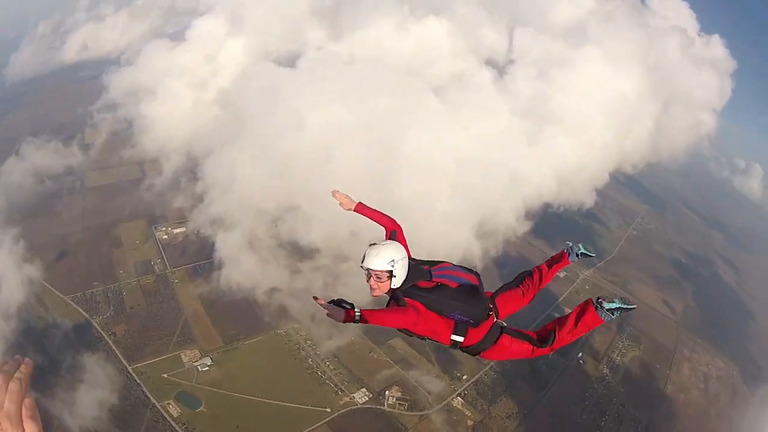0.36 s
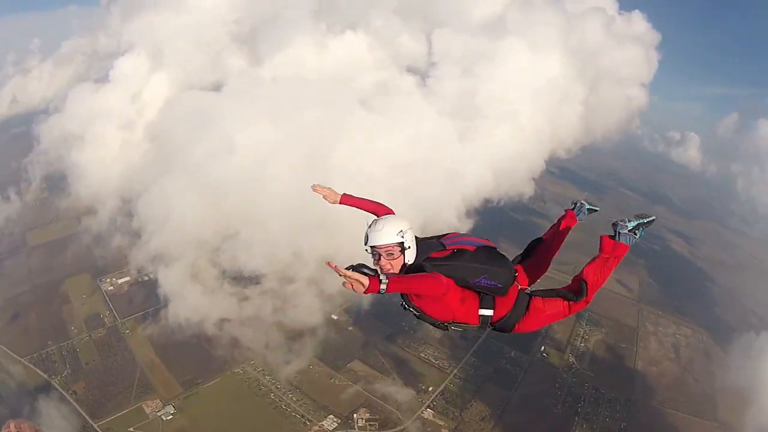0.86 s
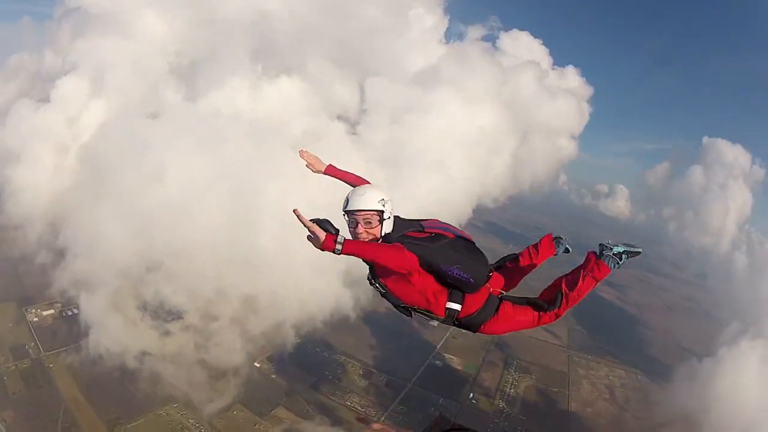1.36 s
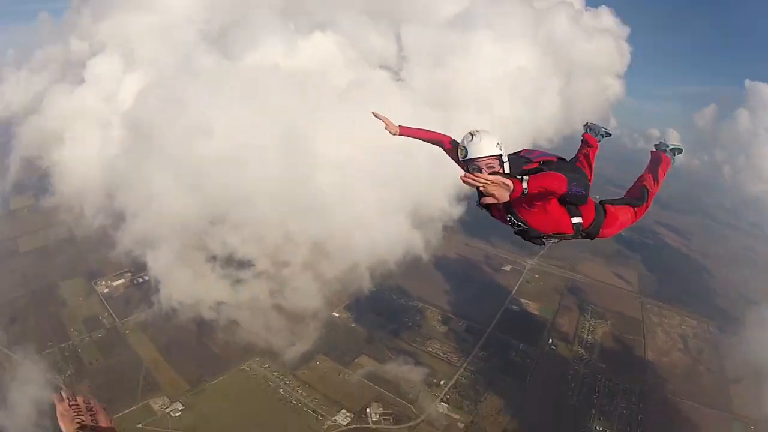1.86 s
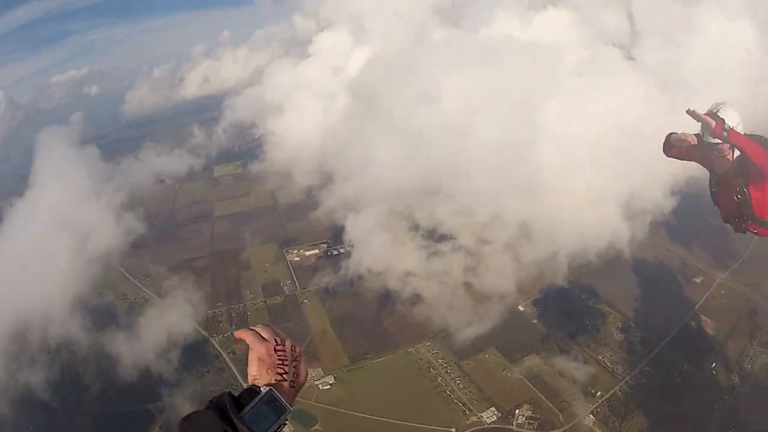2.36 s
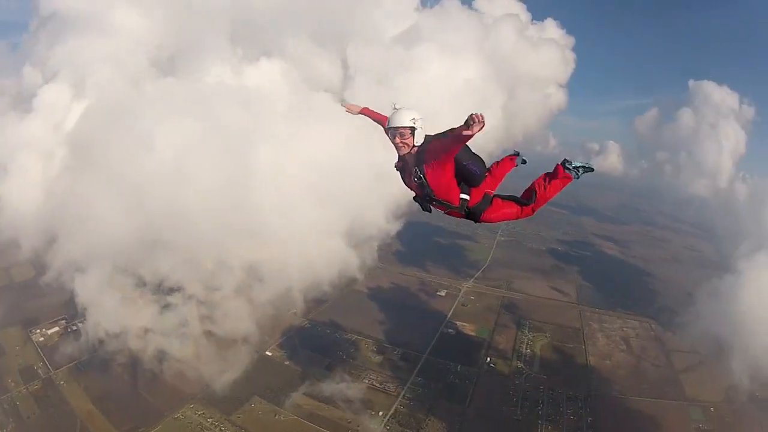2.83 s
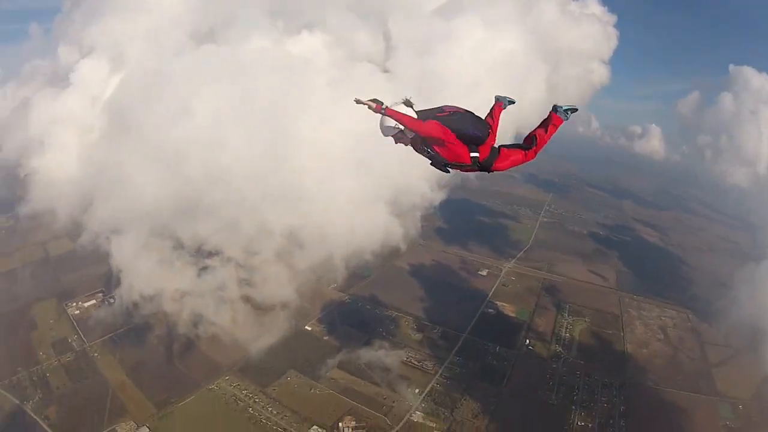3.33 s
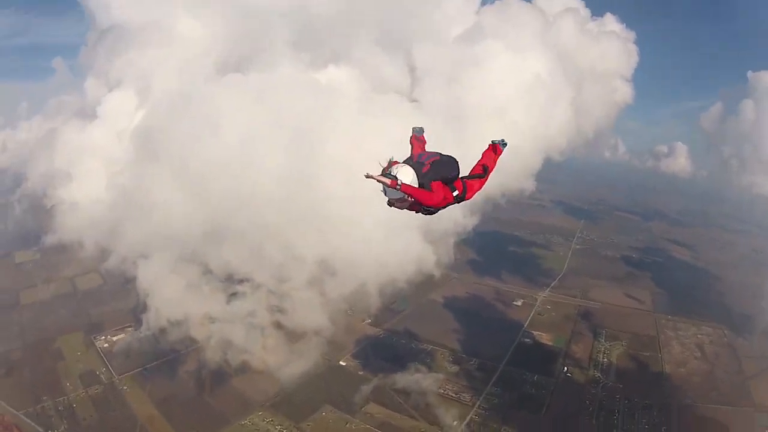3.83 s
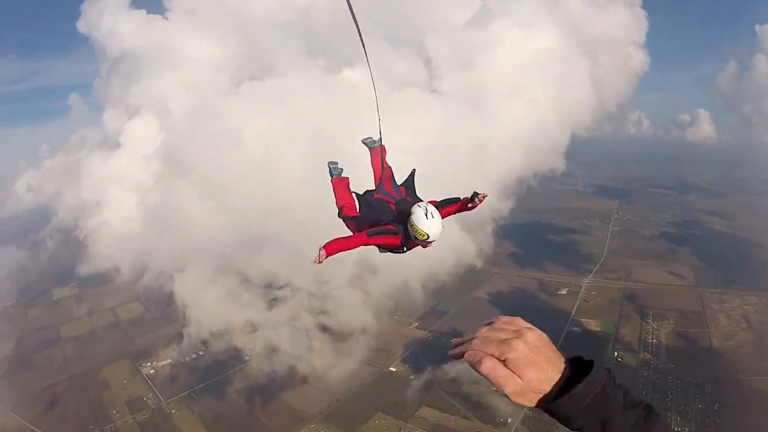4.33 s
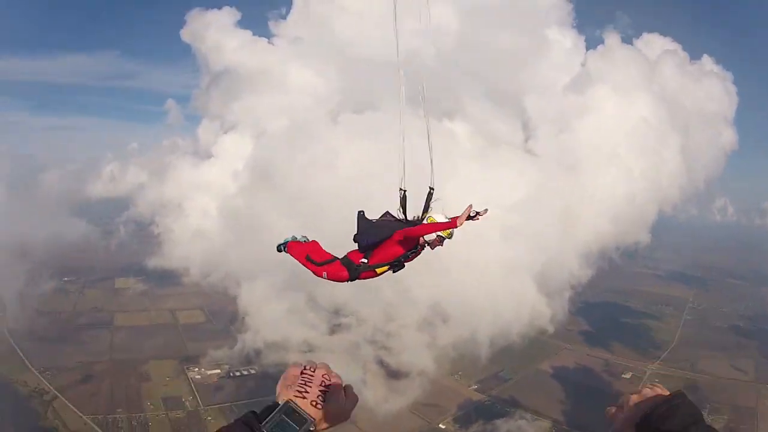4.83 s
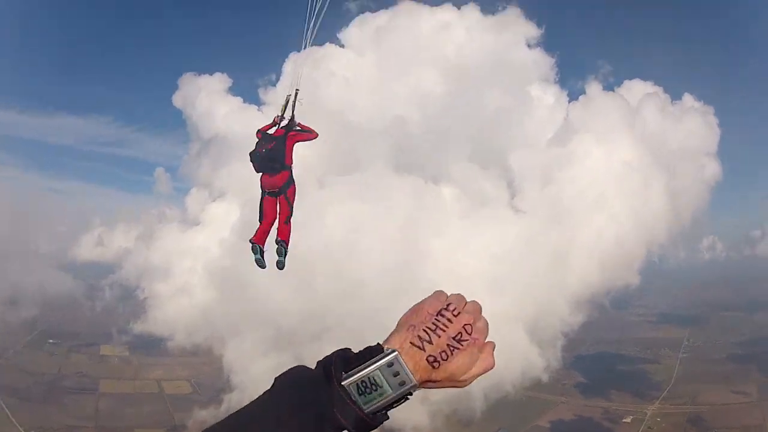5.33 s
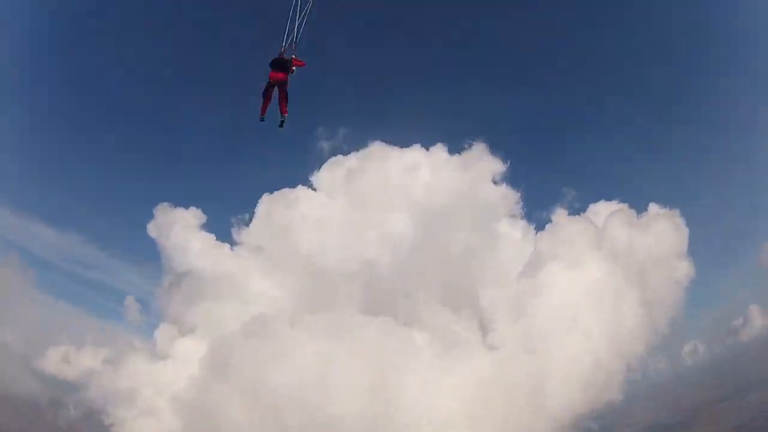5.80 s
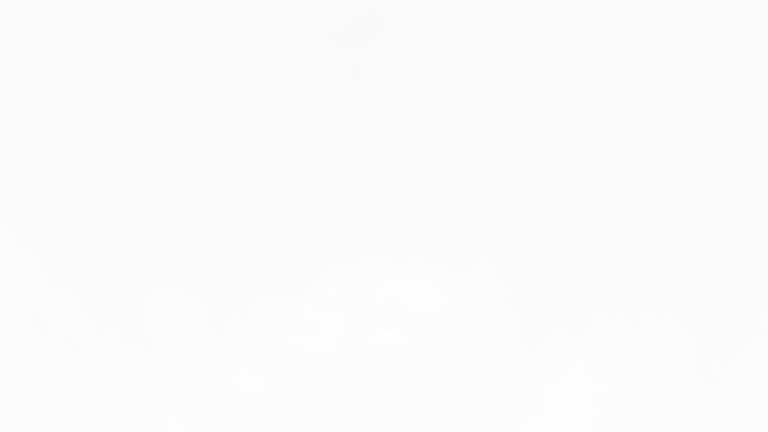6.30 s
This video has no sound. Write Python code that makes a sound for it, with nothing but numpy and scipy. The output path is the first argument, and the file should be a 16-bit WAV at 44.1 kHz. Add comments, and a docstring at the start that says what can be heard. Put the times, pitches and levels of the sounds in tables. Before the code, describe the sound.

Air at skydiving speed tears over a microphone shut in a hard camera case. A lumpy throb near 100 Hz thuds continuously, with quicker slaps above it and rough, flickering, boxy hiss breaking into tiny spits. Gusts and momentary dips come irregularly as the head turns. The sound is clipped, gritty and squashed, with no room echo, and fades quickly at about six seconds.

```python
"""Wind over a cased helmet camera

Air at falling speed tears over a helmet camera shut in a hard case, right at the microphone.
Big eddies buffet the diaphragm near 100 Hz, as lumpy noise with quicker slaps above it.
Small eddies hiss as flickering noise and spit in brief puffs, both through the modes of the case.
The camera ducks and clips, and its samples are held in steps; the sound fades out at the end."""
import sys
import numpy as np
from scipy import signal
from scipy.fft import rfft, irfft
from scipy.io import wavfile
from scipy.ndimage import uniform_filter1d

SR = 44100
rng = np.random.default_rng(int(sys.argv[2]) if len(sys.argv) > 2 else 0)


def attenuation_scalar(level_db):
    """Turn a level in dB into a linear amplitude multiplier (20 dB per decade)."""
    decades = np.asarray(level_db, float) / 20
    return 10 ** decades


def digitize_waveform(pressure):
    """Quantize a signal to 16-bit integers and store it at the path in sys.argv[1].

    Rows of a 2-D input are taken as channels; values are limited to [-1, 1].
    """
    field = np.atleast_2d(pressure).T
    bounded = np.clip(field, -1, 1)
    quanta = np.round(bounded * 32767).astype(np.int16)
    wavfile.write(sys.argv[1], SR, quanta)


N = 294588

# Colour of the small eddies. Each row: frequency in Hz, relative density in dB per Hz.
HISS_SPECTRUM = [(250, -6), (500, -15.5), (800, -11), (1500, -8.5), (2500, -9), (3300, -18.5),
                 (4500, -22.5), (5600, -21.5), (6000, -29.5)]
# The stream as the head turns. Each row: time in seconds, large eddies in dB, small eddies in dB,
# how far the microphone port faces the air (0 to 1).
STREAM = [(0, -29, -38.5, 0.84), (.2, -34.5, -41.5, 0.78), (.45, -32, -44, 0.63), (.6, -27, -44.5, .5),
          (1.1, -28, -42.5, 0.38), (1.5, -28.5, -43.5, 0.2), (2.0, -27.5, -44, 0.57),
          (2.5, -27, -42.5, 0.56), (3.0, -30, -36.5, 0.11), (3.6, -29, -42, 0.5), (4.1, -31, -39.5, .2),
          (4.7, -29.5, -40, 0.34), (5.3, -32, -37, 0), (5.75, -32, -41.5, 0.18), (6.05, -36, -36, 0),
          (6.38, -27.5, -40, 0.46)]
LARGE, SMALL, FACING = 1, 2, 3  # columns of the stream
USUAL_LARGE_DB = -30  # large eddies at which slaps and roar have their plain level


def evened(x):
    """Scales to rms 1."""
    return x / np.sqrt(np.mean(x ** 2) + 1e-20)


def read(points, hz):
    """Reads a spectrum on a log-frequency axis."""
    f, value = np.transpose(points)
    return np.interp(np.log(hz + 1), np.log(f + 1), value)


def control(table, column, t):
    """One column of a control table at times t."""
    rows = np.array(table)
    return np.interp(t, rows[:, 0], rows[:, column])


def wander(low_hz, high_hz):
    """Random wobble of rms 1 with about equal power in each octave of a range of rates."""
    hz = np.fft.rfftfreq(N, 1 / SR)
    shape = 1 / np.sqrt(hz + low_hz) * (hz / (hz + low_hz)) / (1 + (hz / high_hz) ** 2)
    return evened(irfft(rfft(rng.standard_normal(N)) * shape, N))


def noise(field_db, size, patchy_db=0):
    """Noise of rms 1 whose short-time spectrum follows field_db(hz, t), broken into drifting patches."""
    hop = size // 4
    frames = 4 * N // size + 5
    hz = np.fft.rfftfreq(size, 1 / SR)[:, None]
    a, b, patches = rng.standard_normal((frames, len(hz), 3)).T
    patches = uniform_filter1d(patches, size=8, axis=0)
    patches = evened(uniform_filter1d(patches, size=8, axis=1))
    level_db = field_db(hz, np.arange(frames) * size / 4 / SR) + patchy_db * patches
    z = (a + 1j * b) * attenuation_scalar(level_db)
    return evened(signal.istft(z, nperseg=size, noverlap=size - hop)[1][:N])


def partly_levelled(x, power):
    """Divides x by a power of its own slow swing, so that its lumps even out in part."""
    smooth_power = uniform_filter1d(uniform_filter1d(x ** 2, size=1300), size=1300)
    swing = np.sqrt(abs(smooth_power) + 0.045)
    return evened(x / swing ** power)


def bump(t, middle, length, db):
    """A smooth bell in dB, length wide at half height and never under 10 ms."""
    return db * np.exp(-4 * np.log(2) * ((t - middle) / max(length, .01)) ** 2)


def eddies(column, t):
    """Strength in dB of the large or small eddies: the stream plus every gust and lull as a smooth bump."""
    # Each row of both: middle in seconds, length in seconds,
    # change of the large eddies in dB, change of the small eddies in dB.
    gusts = [(.1, 0.11, -4, 5.5), (.54, 0.041, 5.5, 5), (.66, 0.059, -1, 8), (.79, 0.053, 2.5, 8.5),
             (1.17, 0.022, 6, 2.5), (1.27, 0.027, 4, 2.5), (1.4, 0.09, 1.5, 4.5), (1.75, 0.03, 5.5, 9.5),
             (2.15, 0.013, -5, 7), (2.24, 0.026, -2.5, 12), (2.51, 0.024, 7.5, 11.5),
             (2.61, .05, -3.5, 3.5), (2.9, 0.24, 1, -1), (3.12, 0.11, -0.5, 3), (3.38, 0.11, 2.5, -1),
             (3.55, 0.028, -3.5, 6), (3.82, 0.074, -2, 5), (3.94, 0.02, 1.5, 4.5), (4.19, 0.033, 4.5, -3.5),
             (4.27, 0.063, 3.5, 2.5), (4.4, 0.031, -7.5, 2.5), (4.62, 0.027, 2.5, 2), (4.83, .06, 10, 6.5),
             (5.07, 0.15, 1.5, 4), (5.49, 0.064, 4.5, -1), (5.63, 0.023, 0, 3.5), (5.79, .1, 4.5, 4.5)]
    lulls = [(0.051, 0.068, -2.5, -7.5), (0.354, 0.088, -5.5, -0.5), (0.602, 0.035, -8, -3),
             (0.873, 0.034, -6.5, -0.5), (0.958, 0.013, -19, -5), (1.092, 0.021, -0.5, -5.5),
             (1.572, 0.095, -4.5, -2.5), (1.806, 0.078, -8.5, -4), (2.077, 0.058, -3.5, 1.5),
             (2.282, 0.012, -4.5, -22), (2.452, 0.15, -5, -2), (3.265, 0.083, -3.5, -2),
             (3.417, 0.018, -11.5, 10.5), (3.578, 0.024, 2, 1.5), (3.914, 0.037, -3, -1.5),
             (4.09, 0.095, -3.5, -2.5), (4.326, 0.087, -2, -4.5), (4.854, 0.063, -9, -4.5),
             (5.115, 0.027, -5.5, -6), (5.304, 0.14, -4, -5.5), (5.407, 0.026, 2.5, -5),
             (5.684, .04, 2.5, -6), (6.058, 0.091, -6.5, -0.5), (6.17, .05, -1, -5.5)]
    bumps = sum(bump(t, row[0], row[1], row[column + 1]) for row in gusts + lulls)
    return control(STREAM, column, t) + bumps


def buffeting():
    """Large eddies push the diaphragm: a lumpy throb, and quicker slaps above it."""
    # Throb and slaps. Each row: frequency in Hz, relative density in dB per Hz.
    throb_spectrum = [(10, -41), (30, -12.5), (50, -4), (80, 2.5), (104, 7.5), (130, -1), (170, -10),
                      (260, -52.5)]
    slap_spectrum = [(90, -42), (160, 2), (220, -1), (320, -11.5), (480, -23.5), (700, -62)]
    t, coarse = np.arange(N) / SR, np.arange(0, N, 128) / SR
    large_db, small_db = eddies(LARGE, coarse), eddies(SMALL, coarse)

    # slaps take a share of the swing of both eddy sizes, and grow as the port faces the air
    slap_db = -43 + 0.54 * (large_db - USUAL_LARGE_DB)
    slap_db += 0.7 * (small_db - control(STREAM, SMALL, coarse))
    slap_db += 7.5 * control(STREAM, FACING, coarse)

    def throb_field_db(hz, s):
        """Facing the air tilts the throb toward the deep."""
        tilt_db = 4 * control(STREAM, FACING, s) ** 2
        return read(throb_spectrum, hz) - tilt_db * np.log2(hz / 90 + .1)

    def slap_field_db(hz, s):
        """Facing the air raises the pitch of the slaps, by up to 48 percent."""
        facing = np.clip(control(STREAM, FACING, s), 0, 1)
        return read(slap_spectrum, hz / (1 + 0.48 * facing ** 2))

    throb = partly_levelled(noise(throb_field_db, size=2048), 0.612)
    slaps = noise(slap_field_db, size=1024)
    slaps = slaps * evened(attenuation_scalar(2.6 * wander(7.5, 51)))
    throb = throb * attenuation_scalar(np.interp(t, coarse, large_db))
    return throb + slaps * attenuation_scalar(np.interp(t, coarse, slap_db))


def hiss():
    """Small eddies: broad noise that flickers fast over a steadier stream."""
    # One swell of the roar: middle in seconds, length in seconds, rise in dB at its centre.
    roar_surge = (4.4, 0.089, 8.9)
    t, coarse = np.arange(N) / SR, np.arange(0, N, 128) / SR

    def field_db(hz, s):
        """Facing the air brightens the hiss and lifts the 2.5 kHz flutter; large eddies lift the roar."""
        facing = control(STREAM, FACING, s)
        large_rise_db = control(STREAM, LARGE, s) - USUAL_LARGE_DB
        roar_db = -1 + bump(s, *roar_surge) + 0.73 * large_rise_db
        roar = roar_db / (1 + ((hz - 600) / 250) ** 2)
        flutter = (-2.5 + 8.5 * facing) / (1 + ((hz - 2500) / 500) ** 2)
        tilt = (-5 + 6.5 * facing) * np.log2(hz / 1500 + 0.8)
        return read(HISS_SPECTRUM, hz) + roar + flutter + tilt

    bursts = evened(attenuation_scalar(5.08 * np.minimum(wander(14, 170), 2.3)))
    flicker = evened(0.41 + bursts)  # the constant is the steadier stream
    level = attenuation_scalar(np.interp(t, coarse, eddies(SMALL, coarse)))
    return noise(field_db, size=512, patchy_db=1.69) * flicker * level


def spits():
    """Eddies burst on the port: puffs of noise, quick to rise, each around its own pitch; strong ones are brief."""
    # Each row: time in seconds (the puff peaks PEAK_S later), peak in dB ahead of the case, centre in Hz.
    bursts = [(0.0762, -24, 2350), (0.1207, -27.5, 2720), (0.1461, -25.5, 2450), (0.19, -25, 2500),
              (0.2299, -19.5, 2410), (0.3113, -30, 2470), (0.538, -30, 1916), (0.6632, -30, 1820),
              (1.258, -25, 1910), (1.401, -30, 2120), (1.5221, -30, 1890), (1.5377, -26, 1850),
              (1.7325, -25, 1860), (1.7479, -20.5, 1860), (1.7606, -14, 1210), (1.998, -25.5, 2710),
              (2.0187, -18, 2030), (2.1425, -27.5, 1720), (2.2306, -30.5, 2430), (2.3738, -27, 1200),
              (2.4934, -24, 1087), (2.7184, -24, 1890), (2.7836, -27.5, 1820), (2.8682, -31, 1906),
              (2.9861, -32.5, 1810), (3.231, -30.5, 1108), (3.3014, -28, 1880), (3.3237, -28.5, 1036),
              (3.4118, -22.5, 1790), (3.8651, -35, 1810), (3.8838, -24, 1850), (3.9276, -30.5, 1830),
              (3.9354, -24, 1820), (4.0323, -28, 1840), (4.0556, -21.5, 1100), (4.2031, -30, 2130),
              (4.2257, -26, 1170), (4.2578, -30, 1870), (4.28, -23.5, 1870), (4.3862, -30, 1815),
              (4.6068, -31.5, 1820), (4.7272, -27.5, 1870), (4.8346, -23, 1150), (4.8755, -30, 1880),
              (4.975, -26, 1750), (5.0831, -20, 2204), (5.2023, -30, 1130), (5.2127, -19.5, 1120),
              (5.2354, -28.5, 1796), (5.257, -20.5, 1820), (5.3432, -31, 1890), (5.3627, -29, 1870),
              (5.5006, -30, 1780), (5.6052, -28.5, 1860), (5.6447, -27, 1790), (5.6727, -31, 1780),
              (5.8044, -28.5, 1800), (5.8691, -22.5, 1170), (5.8739, -16.5, 1186), (5.921, -24.5, 1830),
              (5.9667, -26.5, 1815), (5.9878, -23.5, 1760), (6.0116, -26, 1150), (6.0666, -29.5, 1150),
              (6.11, -25, 1800), (6.204, -31.5, 1820)]
    PEAK_S = .0022
    out, size = np.zeros(N), 1024
    hz, t = np.fft.rfftfreq(size, 1 / SR), np.arange(size) / SR
    puffs = rng.standard_normal((len(bursts), size))
    for (s, db, centre_hz), puff in zip(bursts, puffs):
        pitch_db = 8 / (1 + ((hz - centre_hz) / 400) ** 2)
        colour = attenuation_scalar(read(HISS_SPECTRUM, hz) + pitch_db)
        colour = colour / (1 + (600 / (hz + 1)) ** 4)  # too brief to carry bass
        length = np.clip(.0028 * attenuation_scalar(-(db + 23)), .001, .004)  # seconds from onset to peak; 2.8 ms at -23 dB
        u = t / length
        shape = u * np.exp(1 - u ** 2 / 2)
        shaped = irfft(rfft(puff) * colour, size) * shape
        gain = np.linalg.norm(shape) / np.linalg.norm(shaped) / 3.35  # peaks stand over the rms
        part = out[round((s + PEAK_S - length) * SR):][:size]
        part += attenuation_scalar(db) * shaped * gain
    return out


def case(x):
    """The sound passes the wall of the case and rings its modes."""
    # Each row: mode frequency in Hz, width in Hz, level in dB over the plain path.
    wall_modes = [(582, 102, 4.5), (1150, 158, -1.5), (1860, 98, 4), (2336, 360, -36), (3592, 115, 4.5),
                  (4635, 130, -5.5)]
    hz = np.fft.rfftfreq(N, 1 / SR)
    modes = sum(attenuation_scalar(db) / (1 + 2j * (hz - f) / width) for f, width, db in wall_modes)
    return irfft(rfft(x) * (1 + modes), N) * attenuation_scalar(-2.0)  # loss in the wall


def scene():
    """Buffeting at the diaphragm, hiss and spits through the case."""
    return (buffeting() + case(hiss() + spits()))[None]


def ducked(x):
    """Gain control: sharp pressure changes over a threshold turn the level down, a few ms late."""
    treble = np.gradient(x) * 4
    power_db = 10 * np.log10(abs(uniform_filter1d(treble ** 2, size=130)) + 1e-12)
    fall = np.arange(N) / SR * 120  # the detector falls back 120 dB a second
    held_db = np.maximum.accumulate(power_db + fall) - fall
    over_db = np.maximum(held_db + 34.0, 0)
    late_db = signal.lfilter(np.ones(400) / 400, 1, over_db)
    return x / attenuation_scalar(.6 * late_db)


def clipped_and_held(x):
    """Clips at 12 kHz sampling and holds each sample for four steps, then limits the band."""
    # Band limit. Each row: frequency in Hz, gain as a plain factor.
    edge = [(0, 1), (15150, 1), (15300, .3), (15750, .05), (15900, 0), (24000, 0)]
    HELD_HZ, STEPS, CEILING = 12000, 4, .0905
    clipped = np.clip(signal.resample_poly(x, 40, 147), -CEILING, CEILING)
    held = np.repeat(clipped, STEPS)  # holding leaves mirror bands around the sampling rate
    band_limit = signal.firwin2(801, *np.transpose(edge), fs=STEPS * HELD_HZ)
    held = signal.oaconvolve(held, band_limit, "same")
    out = signal.resample_poly(held, 147, 160)[:N]
    return np.pad(out, (0, N - len(out)))


def roll_off(x):
    """The treble ends steeply here."""
    return signal.sosfilt(signal.butter(12, 15670, fs=SR, output="sos"), x)


def record(dry):
    """The camera ducks, clips and holds its samples; a straight fade closes the sound."""
    # Closing fade: start in seconds, end in seconds.
    fade = (5.94, 6.389)
    out = clipped_and_held(ducked(dry[0]))
    out = out * np.interp(np.arange(N) / SR, fade, (1, 0))
    return roll_off(out[None])


dry = scene()
out = record(dry)
digitize_waveform(out)
```